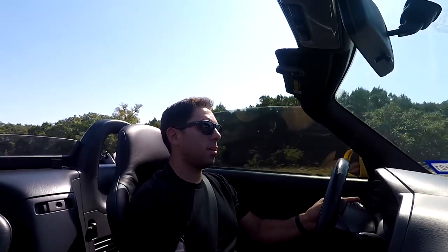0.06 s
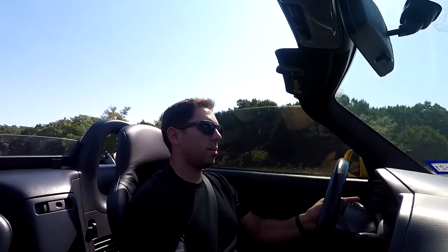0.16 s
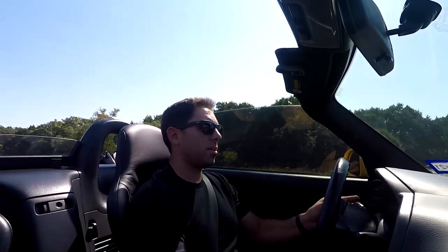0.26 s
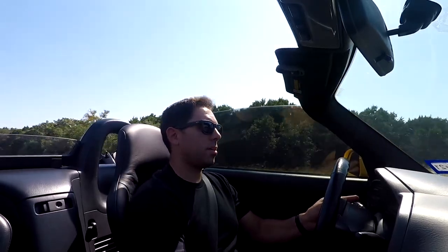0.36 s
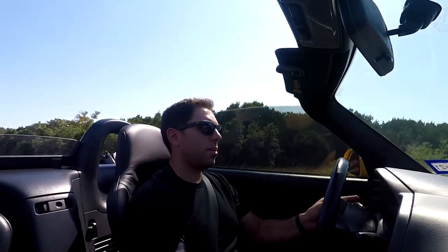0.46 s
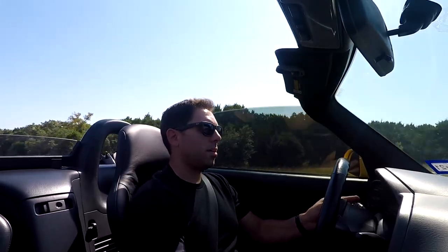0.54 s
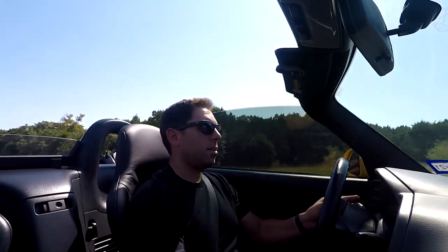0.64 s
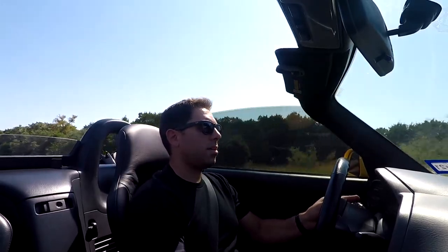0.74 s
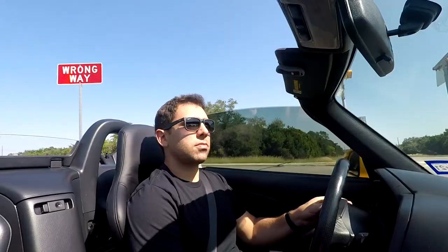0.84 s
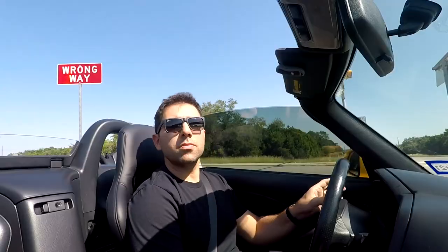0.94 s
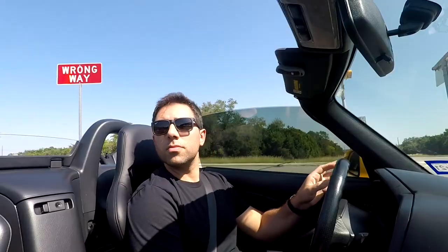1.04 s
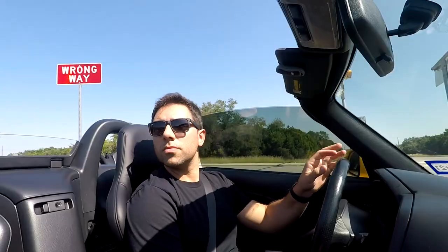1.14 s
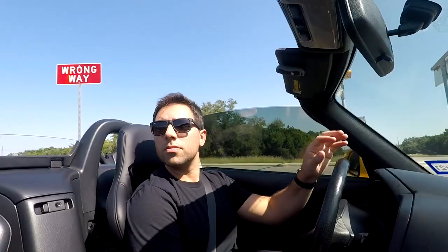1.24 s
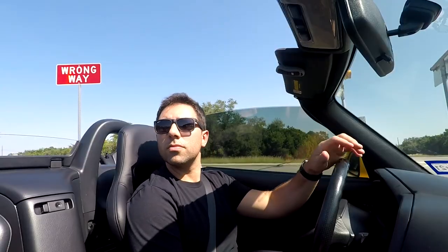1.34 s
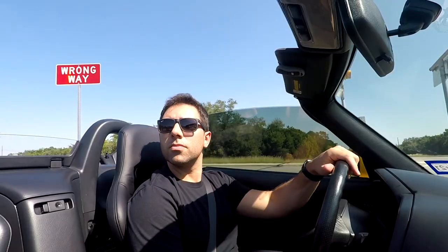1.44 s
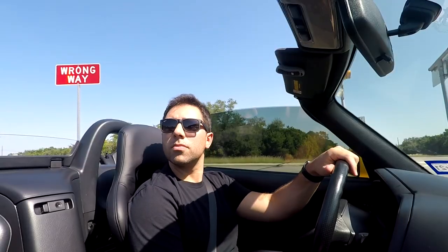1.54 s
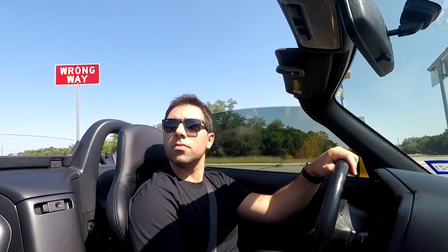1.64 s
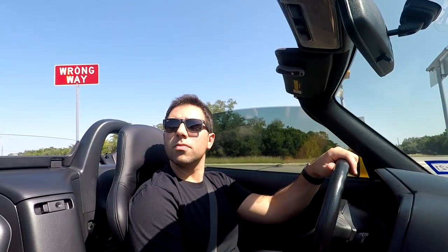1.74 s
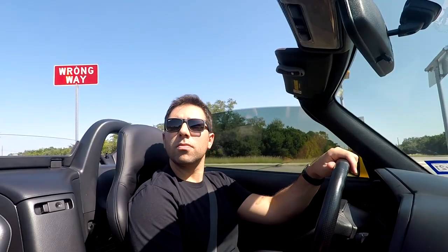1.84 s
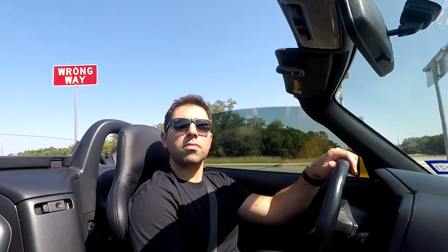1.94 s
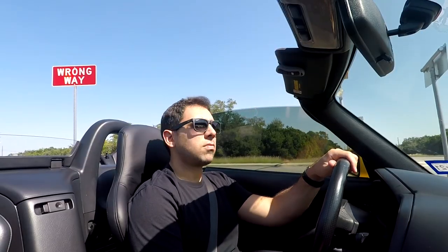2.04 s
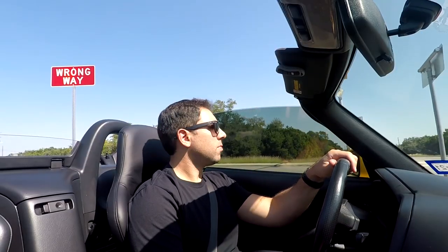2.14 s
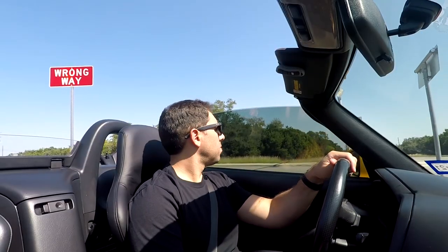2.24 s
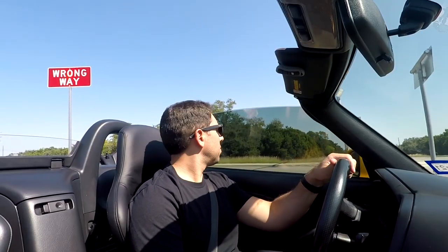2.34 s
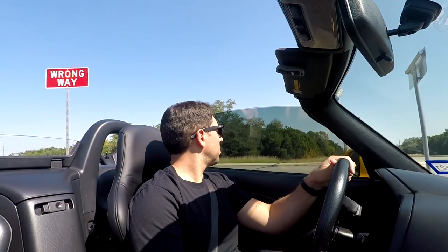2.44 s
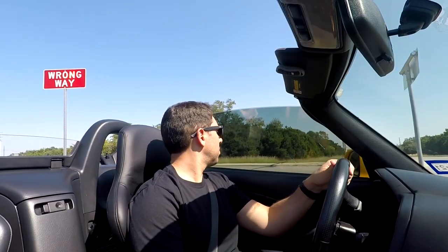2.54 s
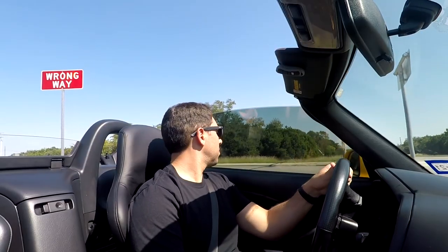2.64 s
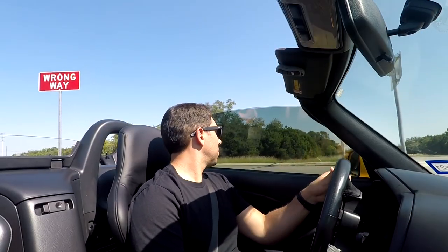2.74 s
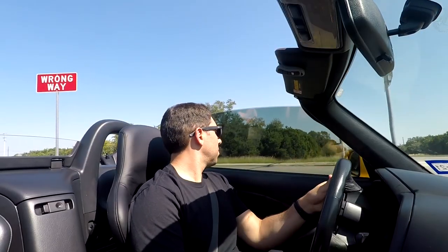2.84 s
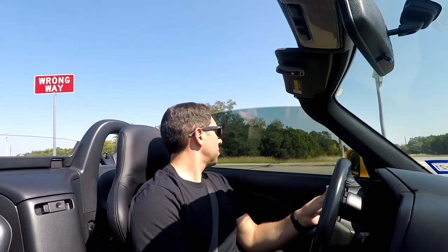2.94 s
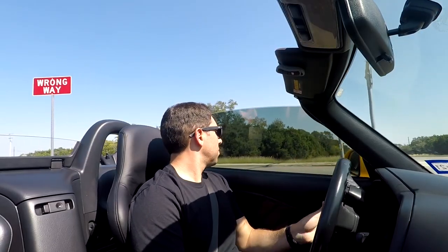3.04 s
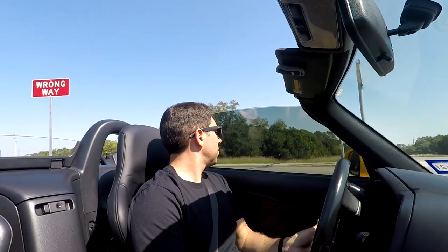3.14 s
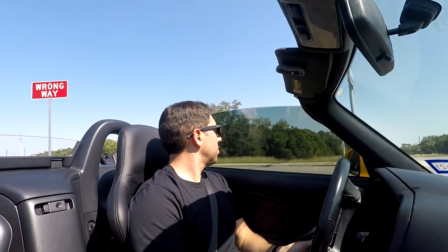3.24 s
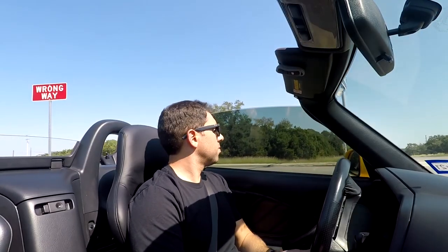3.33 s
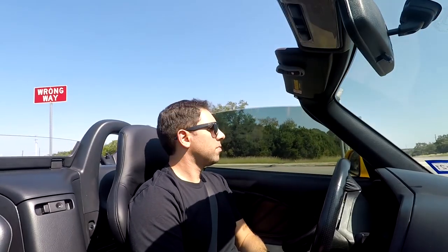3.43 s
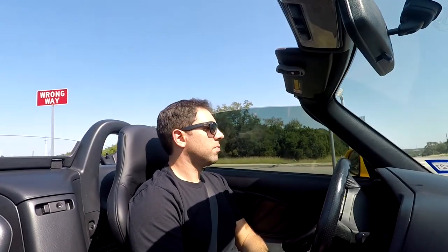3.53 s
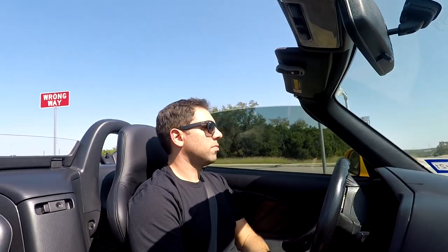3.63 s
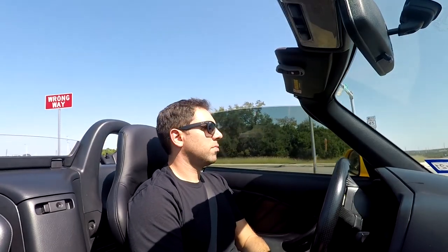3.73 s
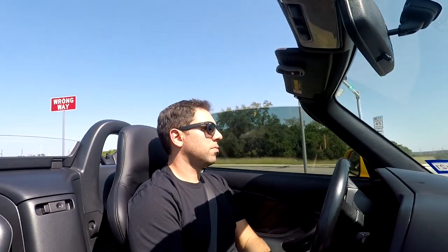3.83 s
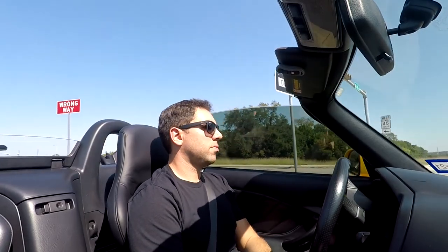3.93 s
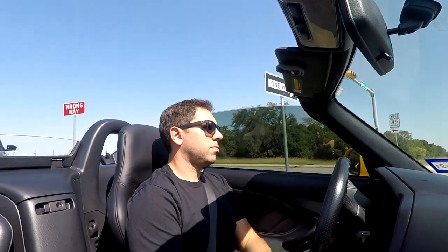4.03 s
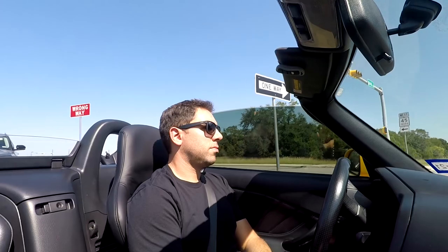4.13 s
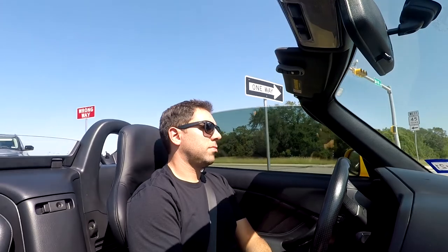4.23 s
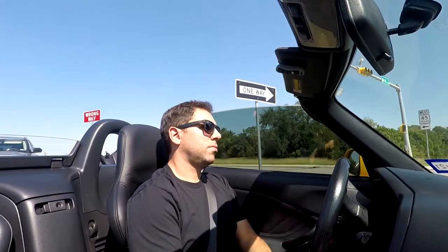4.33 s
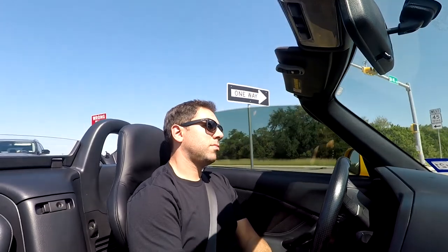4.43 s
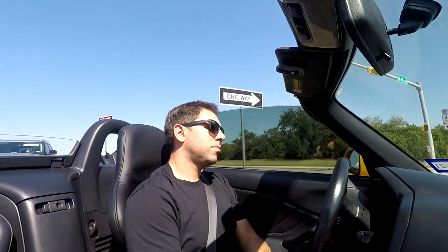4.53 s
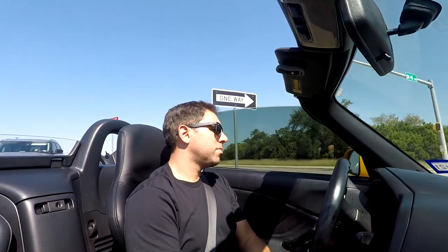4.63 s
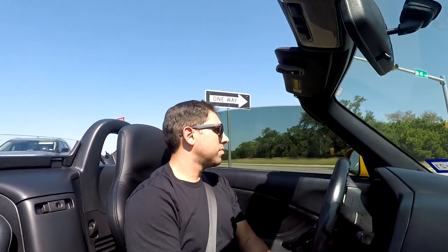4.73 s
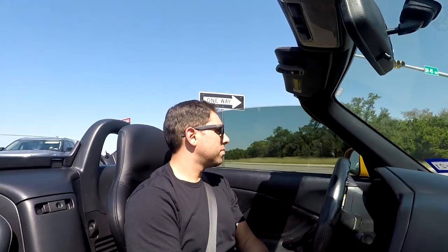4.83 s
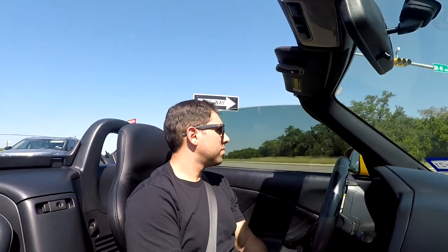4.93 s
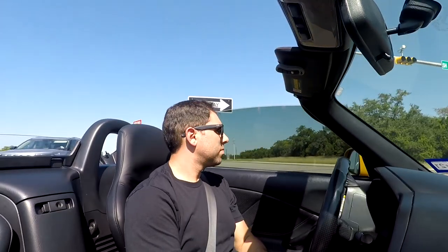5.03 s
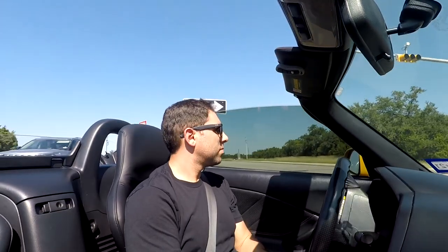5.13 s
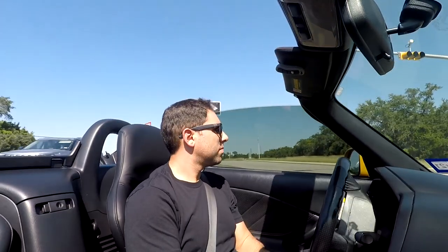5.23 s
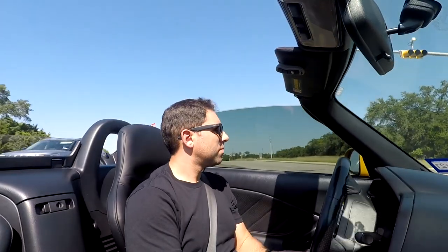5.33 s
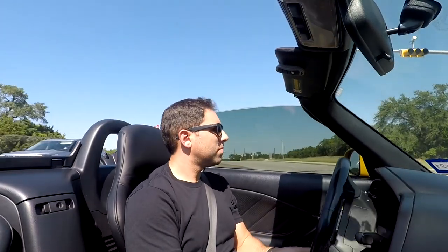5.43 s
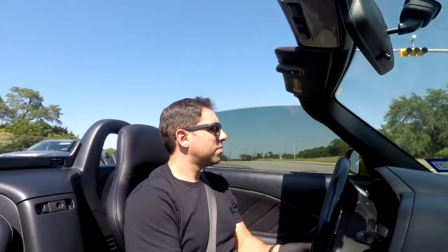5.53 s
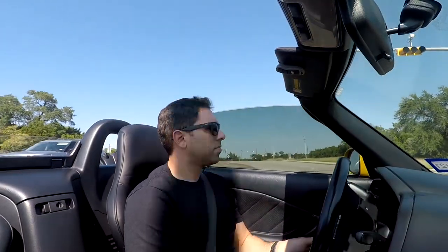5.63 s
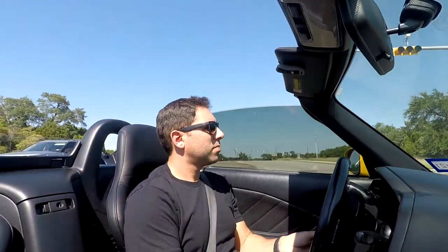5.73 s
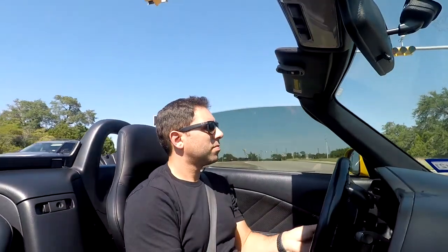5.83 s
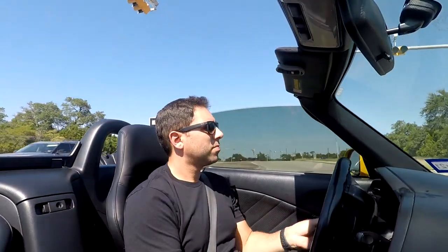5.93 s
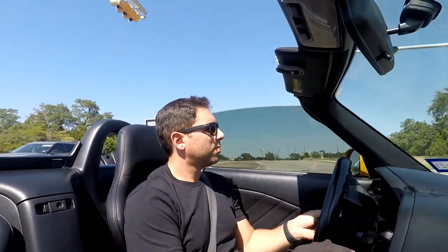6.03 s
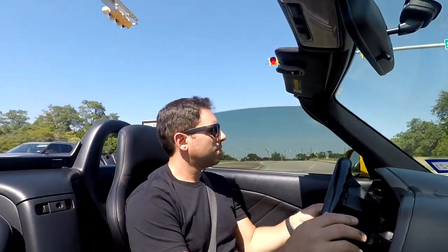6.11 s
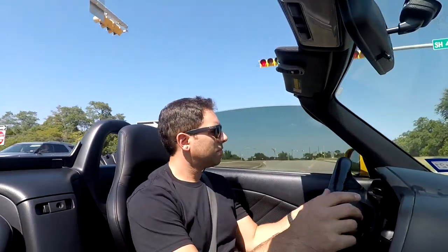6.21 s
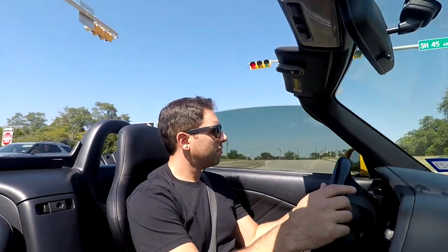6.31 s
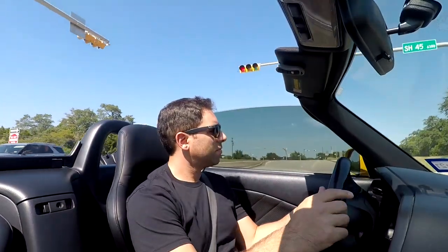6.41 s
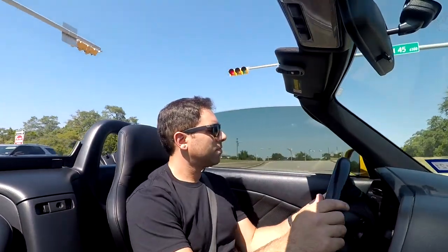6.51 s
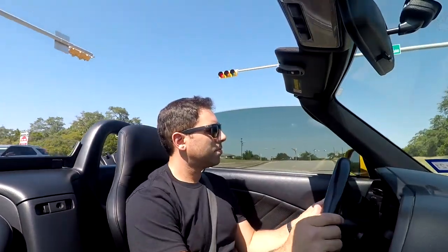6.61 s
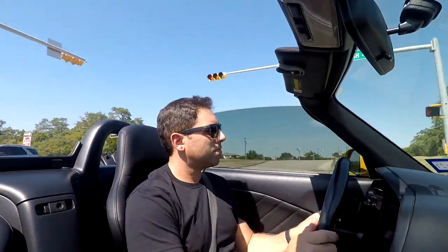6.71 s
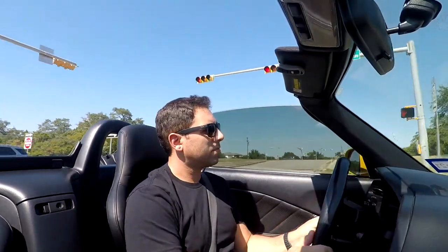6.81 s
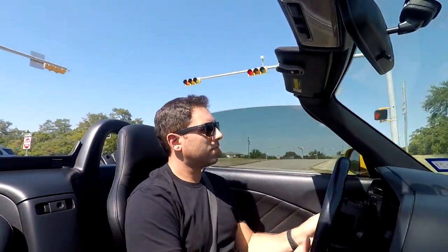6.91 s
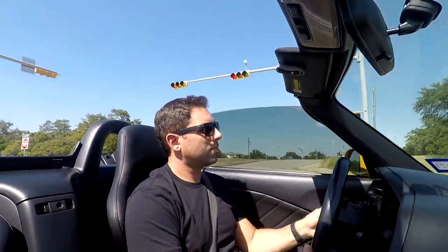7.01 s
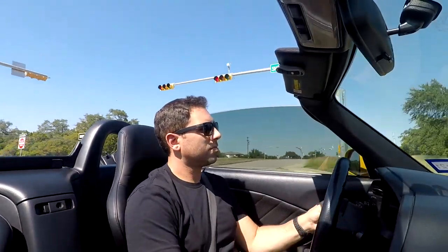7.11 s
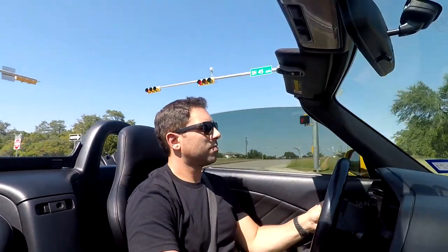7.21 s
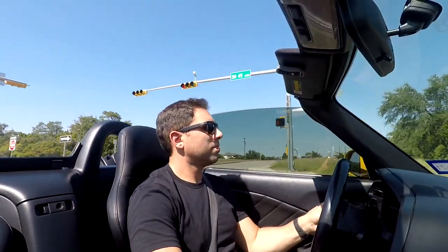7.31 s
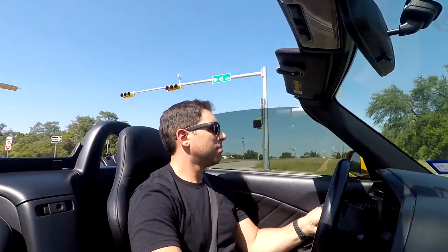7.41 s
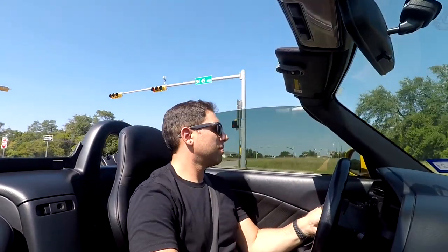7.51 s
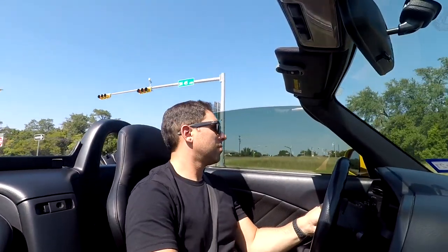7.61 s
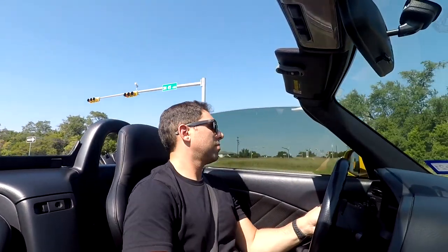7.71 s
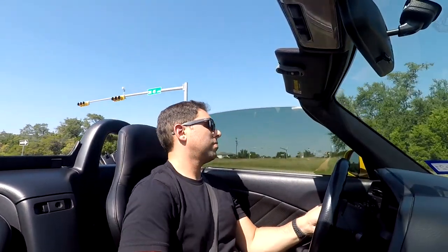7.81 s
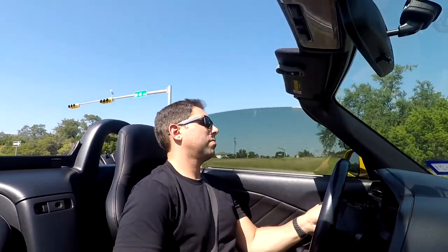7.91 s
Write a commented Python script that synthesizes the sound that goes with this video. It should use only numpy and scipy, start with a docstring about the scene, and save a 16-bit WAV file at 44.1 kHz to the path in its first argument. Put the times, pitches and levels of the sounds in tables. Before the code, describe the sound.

Open sports car cruises, cuts abruptly to idle with indicator ticking, then pulls away and revs hard with blower whine, ending in a fluttering throttle lift.

```python
"""Four firing pulses and a rising blower whine, heard from the passenger seat of an open supercharged sports car.
A moment of cruising cuts to idle at a junction; the indicator ticks, the car pulls away and revs up, and as the
throttle shuts for the shift the bypass valve flutters. Wind buffets the microphone. Engine orders are cosines
locked to one crank; roar, clatter, airflow and wind are shaped noise; whine and tyres are narrow noise bands;
relay and trim taps are noise bursts ringing through resonances."""
import sys
import numpy as np
from scipy import signal
from scipy.io import wavfile
from scipy.ndimage import uniform_filter1d

SR = 44100
rng = np.random.default_rng(int(sys.argv[2]) if len(sys.argv) > 2 else 0)


def to_wav(s):
    """Save 16-bit WAV."""
    ch = np.atleast_2d(s).T  # columns
    pcm = np.round(np.clip(ch, -1, 1) * 32767)  # PCM
    wavfile.write(sys.argv[1], SR, pcm.astype(np.int16))


N = 351036  # samples

# Spectra give only a noise's colour, as its level is set apart. All dB are relative, before later trims.
# Microphone self-noise. Each row: frequency in Hz, density in dB per Hz.
HISS_COLOUR = [(500, 0.5), (5000, -1), (12000, -2.5), (16000, -9.5)]
HISS_DB = -75
EDGE_HZ = 15350  # treble limit
CEILING = .95  # the input stage rounds off peaks near this level
CUT_S = .8053  # cruising ends, the junction begins

# Far vehicle fading past the junction. Each row: time in seconds, centre in Hz, level in dB.
FAR_VEHICLE = [(.81, 1000, -68), (1.0, 890, -61), (1.15, 770, -57), (1.3, 650, -59), (1.45, 600, -80)]
# Tyre roar at cruising speed. One row: centre in Hz, nominal width in Hz, level in dB.
TYRE_ROAR = (730, 450, -39.5)
# Colour of the wind buffet. Each row: frequency in Hz, density in dB per Hz.
BUFFET_COLOUR = [(5, -12), (11, -3), (17, 0), (21, -8), (26, -24), (45, -29), (80, -34), (200, -60)]
# Wind strength, one curve a shot. Each row: time in seconds, level in dB.
CRUISE_WIND = [(0.0, -18), (0.076, -21), (0.222, -36), (0.248, -26), (0.8, -25)]
PULL_WIND = [(0.85, -44), (1.19, -43), (1.38, -29), (2.06, -52), (2.31, -32), (3.01, -48), (3.24, -29.5),
             (3.82, -38), (3.9, -24), (4.02, -39), (4.41, -14.5), (4.71, -27), (4.85, -16.5), (5.6, -36),
             (5.78, -20), (7.5, -20), (7.74, -26), (7.96, -17)]

# Small taps in the cabin trim. Each row: start in seconds, level in dB, pitch in Hz,
# spread as a share of pitch, time for the burst to fall 60 dB in seconds.
TRIM_TAPS = [(1.2835, -47, 5500, 0.91, 0.026), (1.4112, -54.5, 6000, 1.4, 0.015),
             (2.402, -39.5, 2880, 0.32, 0.04), (3.2095, -57, 5865, 1.01, 0.032),
             (3.9316, -56, 7033, 0.96, .02), (3.998, -37.5, 1794, 0.49, 0.058),
             (4.2222, -50, 7500, 0.38, .06), (5.75, -40, 4518, 1.113, .04),
             (6.834, -31, 3487, 1.035, 0.059), (6.851, -32, 3010, 0.43, 0.047)]
# Ringing of the indicator relay. Each row: frequency in Hz, width in Hz, level in dB.
RELAY_RING = [(2410, 250, -10), (3600, 500, -3.5), (5200, 400, 7), (8200, 250, -8.5), (9300, 200, -21.5),
              (10900, 200, -8), (12900, 200, -16), (14500, 200, -14.5)]
# The relay pulls in once a period and lets go after the hold.
RELAY_START_S, RELAY_PERIOD_S, RELAY_HOLD_S, RELAY_TICKS = .8703, .7099, .3205, 15
PULL_IN_DB, LET_GO_DB, LET_GO_HZ = -52.5, -61, 7500.

# Bypass valve puffs. Each row: middle in seconds, peak in dB, bell half length (one sigma) in seconds.
VALVE_PUFFS = [(7.603, -50, .014), (7.688, -52, .011), (7.758, -50, .014), (7.827, -47, .012),
               (7.898, -47, .012), (7.962, -47, .012)]
# Colour of a puff. Each row: frequency in Hz, density in dB per Hz.
PUFF_COLOUR = [(3000, -32), (6500, 5), (7000, -5), (8300, -6), (9200, 3), (9800, -12), (10500, -6),
               (12000, -16), (16000, -17)]

# Noise colours of roar, clatter and airflow. Each row: frequency in Hz, density in dB per Hz.
ROAR_COLOUR = [(20, -23), (45, 2), (100, -8), (220, 1.5), (280, -3), (400, -2.5), (500, -14.5), (630, -10),
               (900, -24.5), (1600, -60.5), (3000, -71)]
CLATTER_COLOUR = [(500, -12), (850, -2), (1000, -0.5), (1150, 0), (1300, -2.5), (1450, -3), (1750, -12.5),
                  (2000, -8.5), (2700, -14.5), (5000, -37), (16000, -58.5)]
AIRFLOW_COLOUR = [(1500, -11.5), (2600, -13.5), (3100, -0.5), (3700, -0.5), (5000, -2), (6400, -2),
                  (8000, -8), (9200, -10.5), (10500, -16), (12500, -20), (16000, -31.5)]
# How those noises follow the revs. Each row: dB at 100 firings a second, dB more per octave of revs,
# dB at rest, dB step once the throttle shuts.
ROAR_GROWTH = (-38.5, 9, -69, -1)
CLATTER_GROWTH = (-46, 11.5, -59, 0.5)
FLOW_GROWTH = (-57.5, 14, -74, -2)
RUMBLE_GROWTH = (-38.5, 6.5, -70, 5)  # the bottom of the roar climbs more slowly
RUMBLE_HZ = 140.
CRUISE_ROAR_DB = 4  # more road under the wheels at cruising speed
BITE_S, BITE_RISE_S, UNLOADED_DB = 1.316, 0.037, -7  # the roar is thin until the clutch takes the load

# Engine bay panels and ducts ring with the noise inside. Each row: frequency in Hz, width in Hz, level in dB.
BAY_RING = [(1138, 23, -3), (1424, 26, -4.5), (1628, 21, -2), (1770, 50, -0.5), (2060, 34, -13),
            (3075, 46, -13.5), (4220, 78, -6.5), (5370, 54, -8.5), (6200, 44, -10), (6590, 48, -5),
            (7740, 55, -5), (9100, 66, -3)]
# Broad rush of air climbing with the blower. One row: multiple of firing rate, width as a share of pitch, dB.
BLOWER_RUSH = (27.8, 0.26, 0.72)
# Rough whine, air singing round the blades. Each row: multiple of firing rate, width as a share of pitch, dB.
BLOWER_WHINE = [(25.4, .025, -4.5), (26.7, .04, -8), (16, .06, -16), (32.5, .06, -13)]
# What whine reaches the seat. Each row: frequency in Hz, gain in dB.
WHINE_TO_SEAT = [(500, -6), (1800, -4), (2400, 0), (3200, 0), (4200, -4), (5000, -10), (9000, -14)]
# Whine against the airflow, one curve a shot. Each row: time in seconds, level in dB.
CRUISE_WHINE = [(0, 1), (.8, 2)]
PULL_WHINE = [(.8, 3), (2.3, 7), (3.9, 10), (4.1, 1), (4.5, 6.5), (5.2, 4.5), (5.8, -2.5), (6.1, -8),
              (6.9, 0.5), (7.41, 6), (7.96, 2)]

# Exhaust overtones that sharpen at high revs. Each row: multiple of firing rate, dB against the roar.
EXHAUST_RASP = [(2.5, -14.5), (3.5, -21), (4.5, -23), (5, -17), (5.5, -26.5), (6, -21), (7, -23), (8, -22)]
# What exhaust rasp reaches the seat. Each row: frequency in Hz, gain in dB.
RASP_TO_SEAT = [(300, -1), (700, -2), (900, -2.5), (1100, 4.5), (1300, -8.5), (1600, 2), (2200, -10)]
# The pipes burble while the throttle is shut. Each row: frequency in Hz, nominal width in Hz, level in dB.
PIPE_BURBLE = [(590, 330, -31), (1480, 190, -50), (1880, 170, -45.5)]
# The burble swells once. One row: middle in seconds, swell in dB, half length in seconds.
BURBLE_SWELL = (7.69, 7, .03)
LIFT_S = 7.595  # the throttle shuts

# Revs, one curve a shot. Each row: time in seconds, firing rate in Hz.
CRUISE_REVS = [(0.0, 118.6), (0.15, 119.7), (0.45, 119.2), (0.62, 118), (0.7, 115.8), (0.807, 114.6)]
PULL_REVS = [(.806, 33), (1.12, 33), (1.24, 29.15), (1.4, 31.2), (1.46, 37.4), (1.6, 51.9), (1.729, 62),
             (1.86, 75), (1.93, 77.1), (2.05, 76.9), (2.449, 67.56), (2.65, 67.1), (2.95, 69),
             (3.249, 64.76), (3.65, 60.16), (3.851, 62.37), (4.13, 70.8), (4.75, 87.7), (5.25, 100.6),
             (5.5, 111), (6.0, 130.7), (6.251, 142.3), (6.5, 149.8), (6.63, 160), (6.88, 169), (7.25, 192),
             (7.53, 210), (7.58, 209.8), (7.66, 195.1), (7.72, 192.8), (7.84, 178.8), (7.96, 173)]
# Engine effort, one curve a shot. Each row: time in seconds, strength of the firing in dB,
# extra strength of the half orders from uneven cylinders in dB.
CRUISE_EFFORT = [(0.0, -6.7, 5.2), (0.6, -7.8, 10.8), (0.807, -4.5, 14.8)]
PULL_EFFORT = [(0.806, -3.4, -14), (1.42, -5.6, -6), (1.52, -0.7, -12.5), (2.1, -5.4, -1.5),
               (2.9, -1.7, -8), (3.9, -3.1, -18), (4.75, 4.2, -15), (5.3, 6, -3), (5.6, 0.8, -5),
               (6.0, -12, 4.2), (6.3, -3.7, 15.7), (6.649, 3.3, 9.8), (6.9, 10, -8), (7.25, 9.8, -4.5),
               (7.4, 8.8, -8), (7.55, 7.2, -3), (7.62, 1.2, 10.8), (7.75, 0.2, 7.6), (7.85, 5.8, 2.2),
               (7.96, 6, -9)]
# The car shudders as the clutch bites. Each row: middle in seconds, swell in dB, half length in seconds.
CLUTCH_SHUDDERS = [(1.232, 9.8, .049), (1.403, 11.5, .049)]
# Engine orders: multiples of the firing rate, then the level of each in dB.
ENGINE_ORDERS = (.5, 1, 1.5, 2, 3, 4)
ENGINE_ORDERS_DB = (-27.0, -10.0, -30.2, -23.6, -31.1, -44.5)
# The cabin booms where an order meets a mode. Each row: frequency in Hz, width in Hz, level in dB.
CABIN_MODES = [(50.0, 17.4, -2.5), (65.7, 14.4, -1.5), (118.8, 37.4, 11.9), (127.4, 46.6, 15.7),
               (141.0, 42.1, 9.2), (174.4, 31.1, -9.3), (205.2, 15.2, -4.2), (256.5, 40.5, -2.7),
               (324.2, 21.2, -18.3), (378.8, 31.7, -9.8), (417.5, 10.8, -3.9)]
# The third and fourth orders come by the tailpipe. Each row: frequency in Hz, width in Hz, level in dB.
TAILPIPE_MODES = [(128, 14, -3), (178, 14, 0), (231, 8, -4), (348, 33, -7), (390.4, 9, 5.5), (458.5, 20, 0),
                  (548, 60, -5), (790, 50, 10)]
TAILPIPE_SHARE = .34  # they follow only this share of the effort's swing in dB
MOUNTS_HZ = 38.  # the engine mounts hold back shaking below this


def gain_of(db):
    """Decibels to gain."""
    return 10 ** (np.asarray(db) / 20)


def evened(x):
    """Scales to rms 1."""
    return x / np.sqrt(np.mean(x ** 2) + 1e-20)


def curve(t, points):
    """Straight lines through (seconds, value) points."""
    return np.interp(t, *np.transpose(points))


def read(points, hz):
    """Reads a spectrum on a log-frequency axis; silent above its last point."""
    f, value = np.transpose(points)
    return np.interp(np.log(hz + 1), np.log(f + 1), value, right=-200)


def bell(t, middle, half):
    """A smooth swell of height 1, down to 1/e at the half length."""
    return np.exp(-((t - middle) / half) ** 2)


def resonate(x, hz, width):
    """A one-pole resonance with a gain of about 1 at its pitch."""
    r = np.exp(-np.pi * width / SR)
    return 2 * signal.lfilter([1 - r], [1, -r * np.exp(2j * np.pi * hz / SR)], x).real


def modes(table, hz):
    """Gain of a set of modes along the curve hz; neighbours are of opposite sign."""
    grid = np.arange(1000.)
    response = sum((-1) ** k * gain_of(db) / (1 + 2j * (grid - f) / w)
                   for k, (f, w, db) in enumerate(table))
    return np.interp(hz, grid, abs(response))


def noise(t, spectrum, patchy_db, size=1024):
    """Noise of rms 1 from random short-time spectra with drifting patches."""
    frames, hz = len(t) * 4 // size + 5, np.fft.rfftfreq(size, 1 / SR)[:, None]
    a, b, patches = rng.standard_normal((frames, len(hz), 3)).T
    patches = uniform_filter1d(patches, size=10, axis=0)
    patches = evened(uniform_filter1d(patches, size=10, axis=1))
    z = (a + 1j * b) * gain_of(read(spectrum, hz) + patchy_db * patches)
    return evened(signal.istft(z, nperseg=size, noverlap=size * 3 // 4)[1][:len(t)])


def band(t, hz, width):
    """A narrow band of noise round a fixed or moving pitch: slow complex noise carried on that pitch."""
    r = np.exp(-np.pi * width / SR)
    slow = signal.lfilter([1], [1, -2 * r, r * r], rng.standard_normal((len(t), 2)), axis=0)
    turn = 2 * np.pi * np.cumsum(hz * np.ones(len(t))) / SR
    return evened(slow[:, 0] * np.cos(turn) + slow[:, 1] * np.sin(turn))


def wander(t, hz):
    """Slow chance up to about hz."""
    step = 64  # samples between the drawn points
    slow = signal.lfilter(*signal.butter(2, 2 * hz * step / SR), rng.standard_normal(len(t) // step + 2))
    return np.interp(np.arange(len(t)) / step, np.arange(len(slow)), evened(slow))


def law(hz, shut, at_db, octave_db, rest_db, shut_db):
    """Gain of a noise that grows with the revs over a resting level."""
    growing = gain_of(at_db + octave_db * np.log2(hz / 100) + shut_db * shut)
    return np.hypot(growing, gain_of(rest_db))


def add(mix, s, sound):
    """Mixes a sound in at s seconds."""
    part = mix[round(s * SR):][:len(sound)]
    part += sound[:len(part)]


def far_vehicle(t):
    """A faint band of noise that sinks in pitch as it moves off."""
    s, hz, db = np.transpose(FAR_VEHICLE)
    return gain_of(np.interp(t, s, db, right=-200)) * band(t, np.interp(t, s, hz), 120.)


def tyres(t):
    """Tread on the road as one steady, wide band of noise."""
    hz, width, db = TYRE_ROAR
    return gain_of(db) * band(t, hz, width)


def wind_buffet(t, wind):
    """Turbulence at the microphone: deep noise whose strength gusts and wavers."""
    gust = gain_of(curve(t, wind) + 1.5 * wander(t, 6.))
    return gust * noise(t, BUFFET_COLOUR, patchy_db=2.0, size=8192)


def trim_taps():
    """A sharp tick that rings a short band of noise."""
    out, t = np.zeros(N), np.arange(3000) / SR
    for s, db, hz, spread, t60 in TRIM_TAPS:
        burst = rng.standard_normal(len(t)) * gain_of(-60 * t / t60)
        ring = resonate(resonate(burst, hz, spread * hz), hz, spread * hz)
        add(out, s, gain_of(db - 5.) * ring / np.std(ring[:150]))
    return out


def indicator_relay():
    """The armature snaps and chatters for some 15 ms; letting go hardly rings the low modes."""
    out, t = np.zeros(N), np.arange(3000) / SR
    for tick in range(RELAY_TICKS):
        lets_go = tick % 2
        chatter = rng.standard_normal(len(t)) * gain_of(-60 * t / 0.054)
        chatter *= 1 + .8 * bell(t, .012, .002)  # a second knock
        chatter *= np.minimum(t / .003, 1)
        ring = sum(gain_of(db) * resonate(chatter, f, w) / np.sqrt(w) for f, w, db in RELAY_RING)
        ring += gain_of(-30.5) * resonate(chatter, 4500., 8000.)  # the dry snap between the modes
        if lets_go:
            ring = signal.lfilter(*signal.butter(2, 2 * LET_GO_HZ / SR, "high"), ring)
        start = RELAY_START_S + tick // 2 * RELAY_PERIOD_S + lets_go * RELAY_HOLD_S
        level = gain_of(LET_GO_DB if lets_go else PULL_IN_DB)
        add(out, start, level * ring / np.std(ring[:300]))
    return out


def bypass_valve():
    """Boost escapes in quick soft puffs of bright air."""
    t = np.arange(N) / SR
    swell = sum(gain_of(db) * np.exp(-.5 * ((t - s) / half) ** 2) for s, db, half in VALVE_PUFFS)
    return gain_of(3.0) * swell * noise(t, PUFF_COLOUR, patchy_db=0.5, size=256)


def engine_bay(t, hz, beat, clatter, flow):
    """Clatter, airflow and blower rush, setting the panels and ducts around them ringing."""
    multiple, share, rush_db = BLOWER_RUSH
    bay = clatter * noise(t, CLATTER_COLOUR, patchy_db=1.04) * (1 + 0.067 * beat)
    bay += flow * noise(t, AIRFLOW_COLOUR, patchy_db=2.0) * (1 + 0.066 * beat)
    rush = band(t, multiple * hz, share * multiple * hz.max())
    bay += flow * (hz / 200.0) ** 0.65 * gain_of(rush_db) * rush
    return bay + sum(gain_of(db) * resonate(bay, f, w) for f, w, db in BAY_RING)


def blower_whine(t, hz, flow, whine_db):
    """Air singing round the blades: noise bands at multiples of the firing rate, wavering in level."""
    tones = sum(gain_of(db + read(WHINE_TO_SEAT, k * hz) + 1.5 * wander(t, 7.7))
                * band(t, k * hz, w * k * hz.mean()) for k, w, db in BLOWER_WHINE)
    return flow * gain_of(curve(t, whine_db)) * tones


def roar_and_rumble(t, beat, roar, rumble):
    """One rushing noise, split so that its bottom can climb more slowly."""
    air = gain_of(8.) * noise(t, ROAR_COLOUR, patchy_db=1.2, size=2048) * (1 + .18 * beat)
    low = signal.filtfilt(*signal.butter(2, 2 * RUMBLE_HZ / SR), air)
    return roar * (air - low) + rumble * low


def exhaust_rasp(t, hz, turns, shut, roar):
    """Overtones of the firing that grow with the revs and stop when the throttle shuts."""
    load = (1 - shut) * (hz / 110.0) ** 1.2
    tones = sum(gain_of(db + read(RASP_TO_SEAT, k * hz) + 3. * wander(t, 10.))
                * np.sin(2 * np.pi * (k * turns + rng.random())) for k, db in EXHAUST_RASP)
    return roar * load * tones


def pipe_burble(t, shut):
    """Noise bands at the pipes' pitches, let through while the throttle is shut."""
    middle, swell_db, half = BURBLE_SWELL
    level = gain_of(1.2 * wander(t, 30.) + swell_db * bell(t, middle, half))
    return shut * level * sum(gain_of(db) * band(t, f, w) for f, w, db in PIPE_BURBLE)


def engine_orders(t, hz, turns, effort):
    """Cosines sharing one crank, lined up into a pressure dip at each firing, boomed by cabin and tailpipe."""
    s, firing_db, uneven_db = np.transpose(effort)
    shudder = sum(gain_of(db) ** 2 * bell(t, at, half) for at, db, half in CLUTCH_SHUDDERS)
    push = gain_of(np.interp(t, s, firing_db)) * np.sqrt(1 + shudder)
    uneven = gain_of(np.interp(t, s, uneven_db))
    out = np.zeros(len(t))
    for k, db in zip(ENGINE_ORDERS, ENGINE_ORDERS_DB):
        by_cabin = k < 3
        level = np.sqrt(2) * gain_of(db + (0.66 if by_cabin else 2.5) * wander(t, 23.0))
        if k % 1:  # a half order
            level = level * uneven
        if by_cabin:
            mounts = 1 / np.sqrt(1 + (MOUNTS_HZ / (k * hz)) ** 8)
            path = push * modes(CABIN_MODES, k * hz) * mounts
        else:
            path = push ** TAILPIPE_SHARE * modes(TAILPIPE_MODES, k * hz)
        out -= level * path * np.cos(2 * np.pi * k * turns)
    return out


def drive(t, revs, effort, wind, whine_db, road_db):
    """One shot of the running car: every engine sound follows the same revs and throttle, while the wind gusts
    along its own curve."""
    hz = curve(t, revs)
    turns = np.cumsum(hz * (1 + 0.0059 * wander(t, 25.))) / SR  # combustion is never quite even
    beat = np.cos(2 * np.pi * turns)  # the noises swell a little with each firing
    shut = np.clip((t - LIFT_S) / 0.015, 0, 1)
    roar = law(hz, shut, *ROAR_GROWTH) * gain_of(road_db)
    rumble = law(hz, shut, *RUMBLE_GROWTH) * gain_of(road_db)
    clatter = law(hz, shut, *CLATTER_GROWTH)
    flow = law(hz, shut, *FLOW_GROWTH)
    out = wind_buffet(t, wind)
    out += engine_bay(t, hz, beat, clatter, flow)
    out += blower_whine(t, hz, flow, whine_db)
    out += roar_and_rumble(t, beat, roar, rumble)
    out += exhaust_rasp(t, hz, turns, shut, roar)
    out += pipe_burble(t, shut)
    return out + engine_orders(t, hz, turns, effort)


def scene():
    """Two shots joined by a hard cut, plus the small sounds."""
    t, cut = np.arange(N) / SR, round(CUT_S * SR)
    before, after = t[:cut], t[cut:]
    cruise = drive(before, CRUISE_REVS, CRUISE_EFFORT, CRUISE_WIND, CRUISE_WHINE, CRUISE_ROAR_DB)
    cruise += tyres(before)
    # a short fade in, and a splice of a few samples
    cruise *= np.clip(np.minimum(before / .005, (CUT_S - before) / .00012), 0, 1)
    unloaded_db = UNLOADED_DB * np.clip((BITE_S - after) / BITE_RISE_S + 1, 0, 1)
    pull = drive(after, PULL_REVS, PULL_EFFORT, PULL_WIND, PULL_WHINE, unloaded_db)
    pull += far_vehicle(after)
    return (np.r_[cruise, pull] + trim_taps() + indicator_relay() + bypass_valve())[None]


def record(dry):
    """Adds microphone self-noise, a soft ceiling and a steep treble limit."""
    wet = dry + gain_of(HISS_DB) * noise(np.arange(N), HISS_COLOUR, patchy_db=4.5)
    wet = wet / (1 + (wet / CEILING) ** 6) ** (1 / 6)
    lowpass = signal.firwin(511, EDGE_HZ, window=("kaiser", 9), fs=SR)
    return signal.oaconvolve(wet, lowpass[None], "same")


dry = scene()
out = record(dry)
to_wav(out)
```